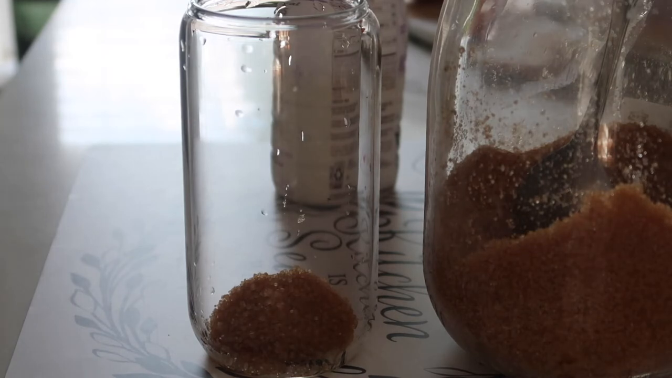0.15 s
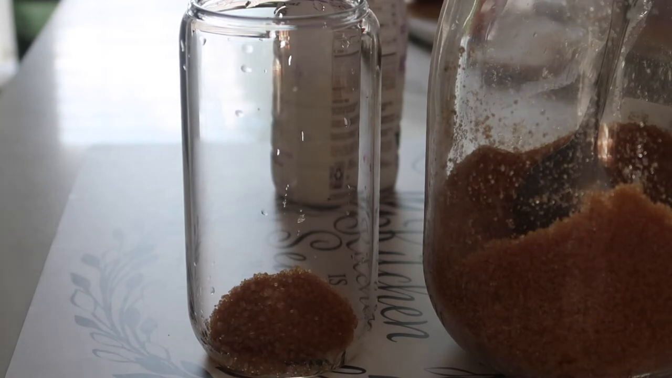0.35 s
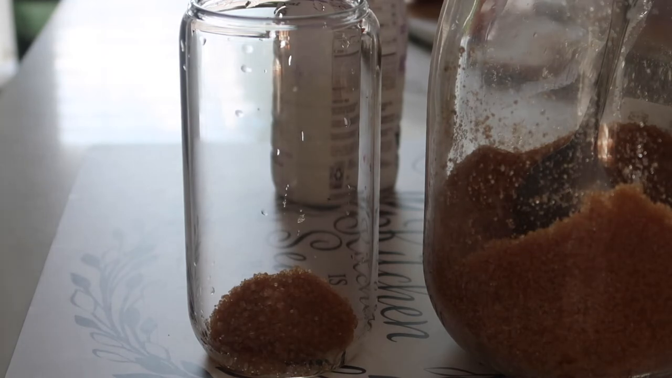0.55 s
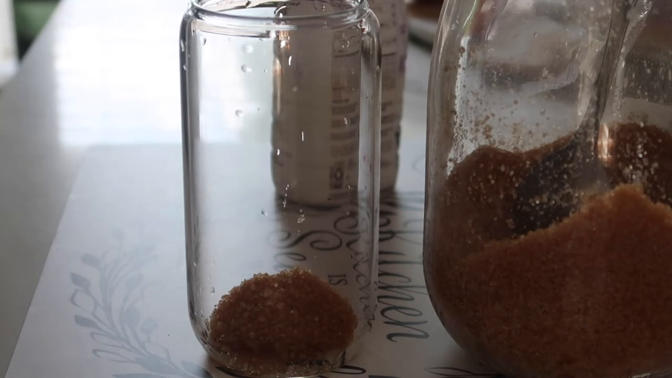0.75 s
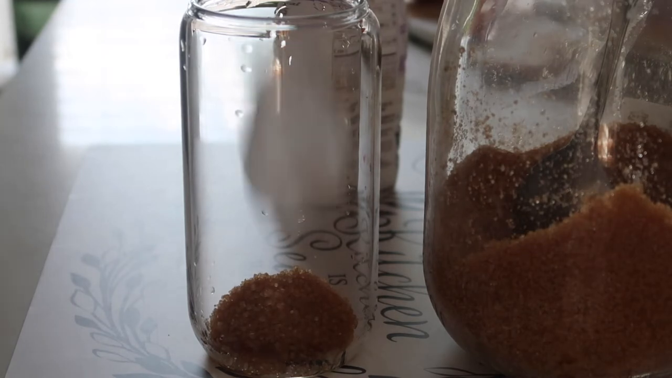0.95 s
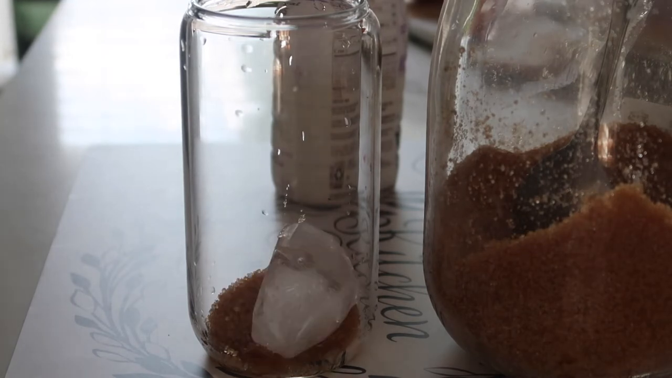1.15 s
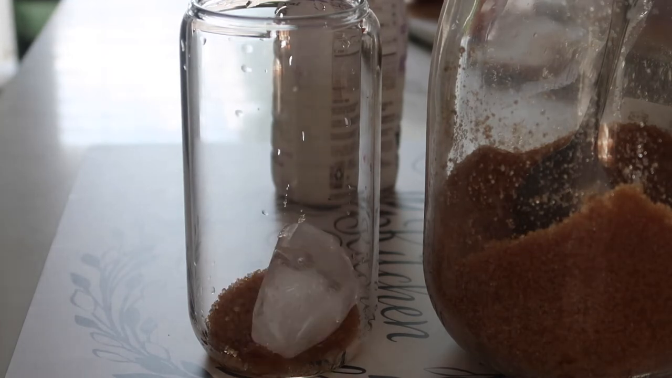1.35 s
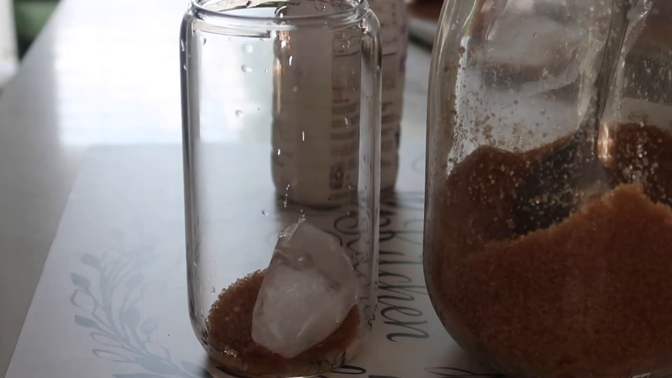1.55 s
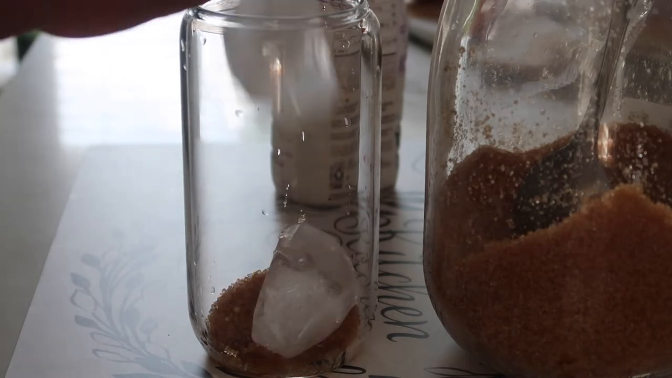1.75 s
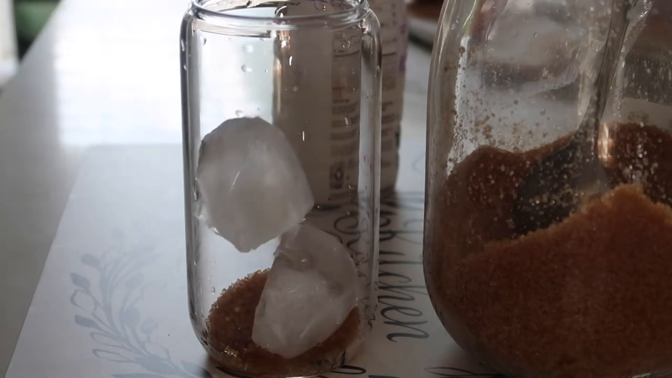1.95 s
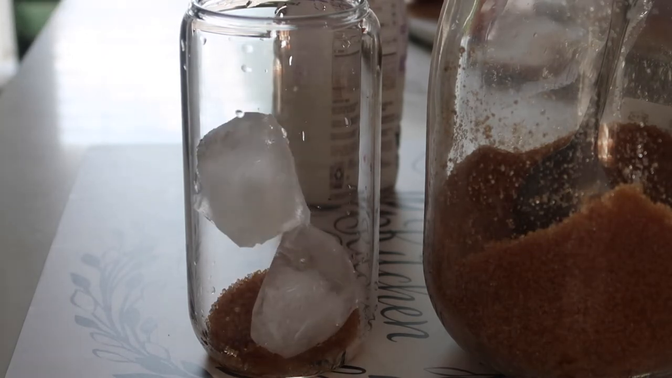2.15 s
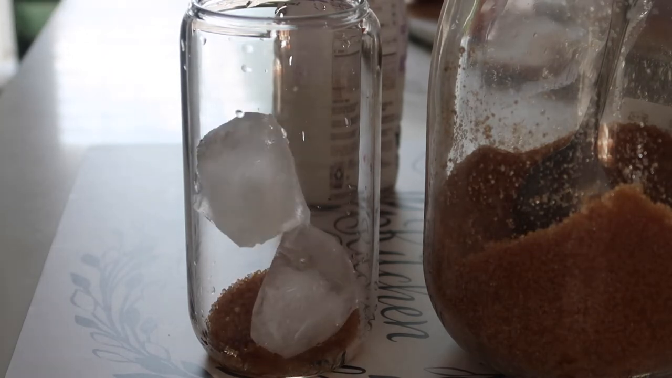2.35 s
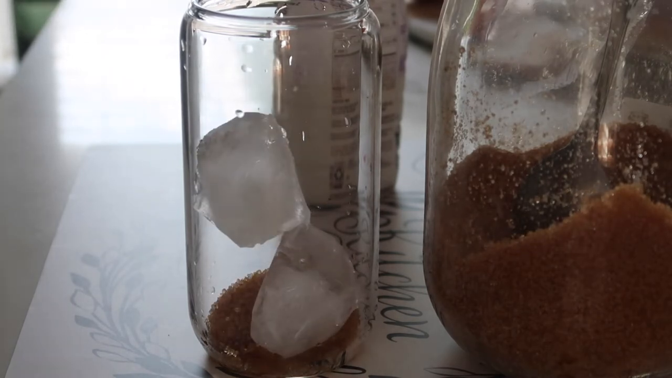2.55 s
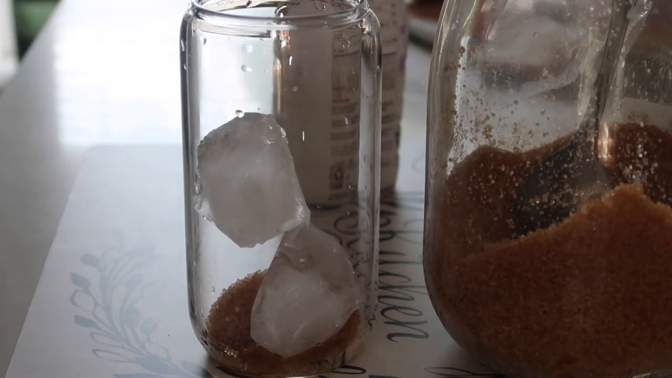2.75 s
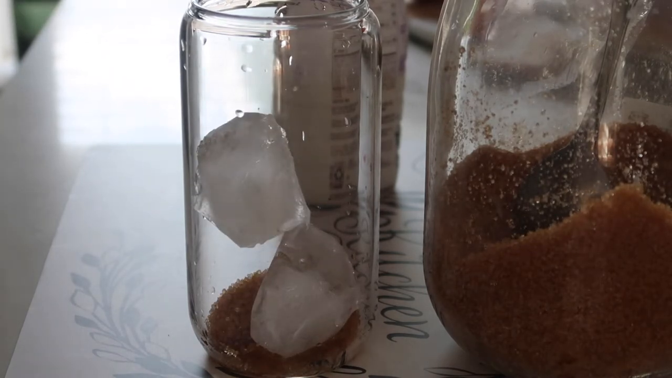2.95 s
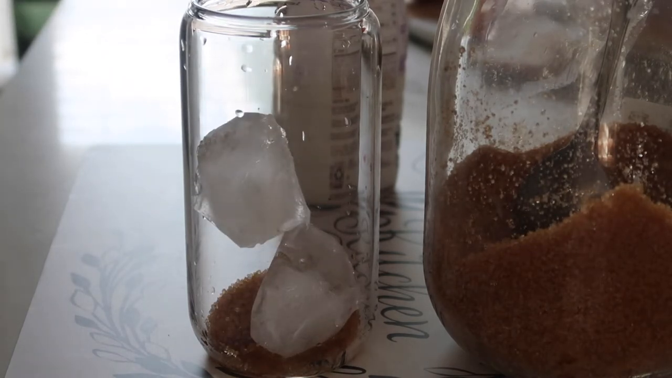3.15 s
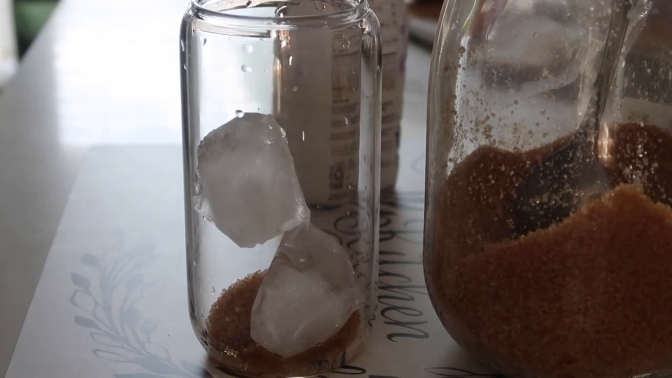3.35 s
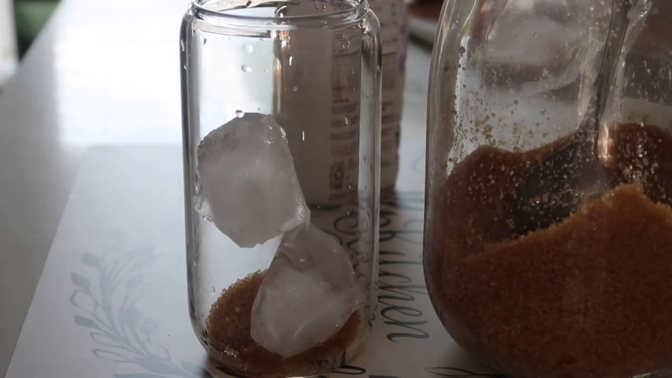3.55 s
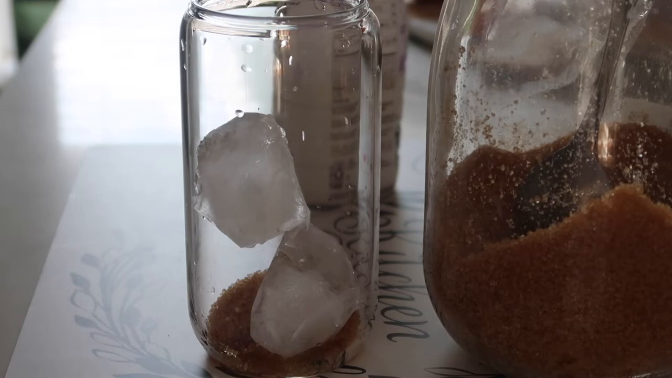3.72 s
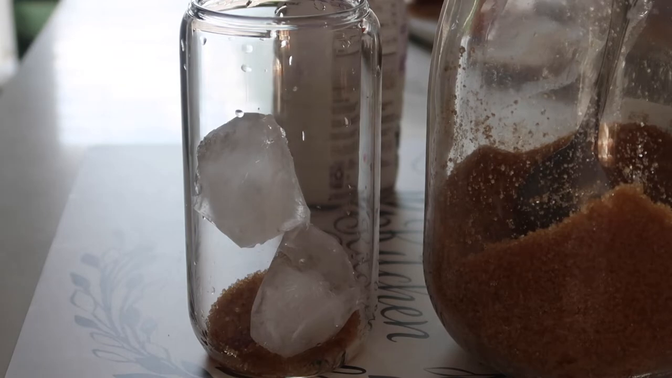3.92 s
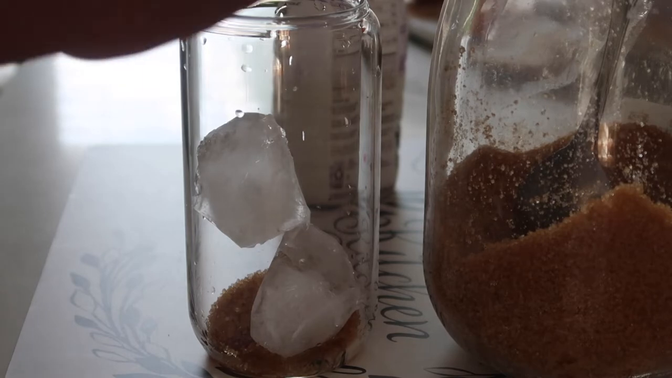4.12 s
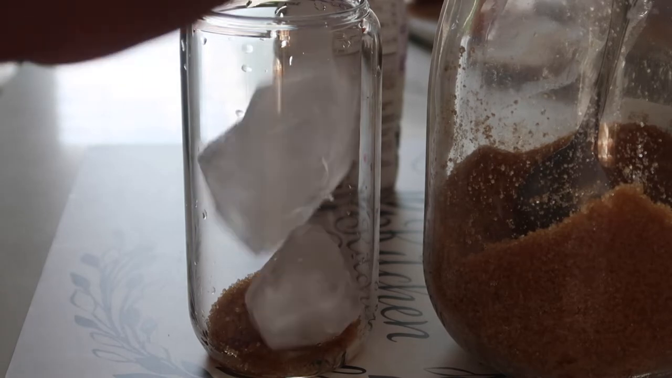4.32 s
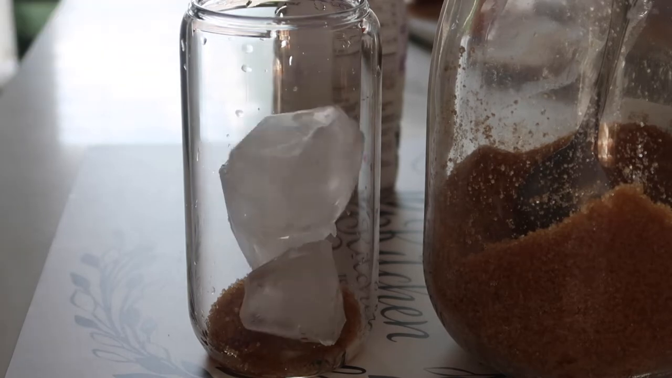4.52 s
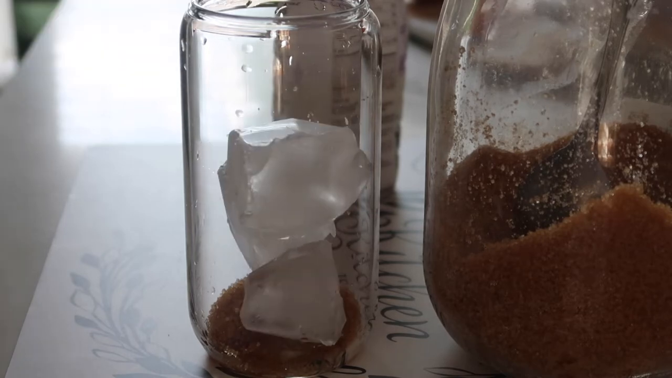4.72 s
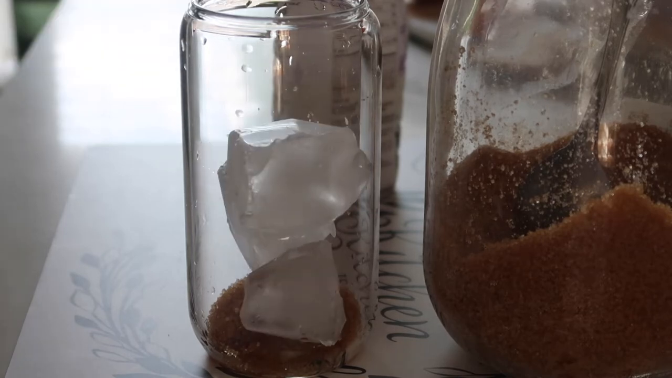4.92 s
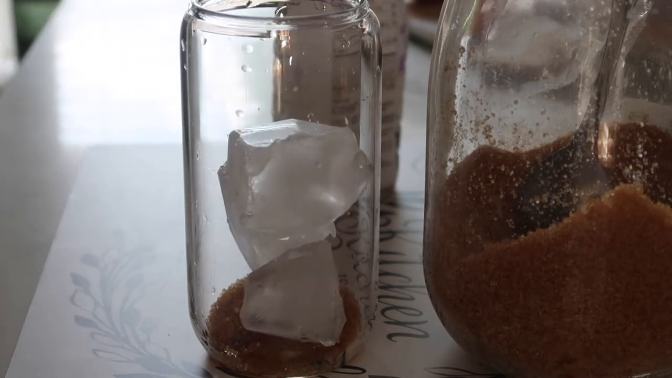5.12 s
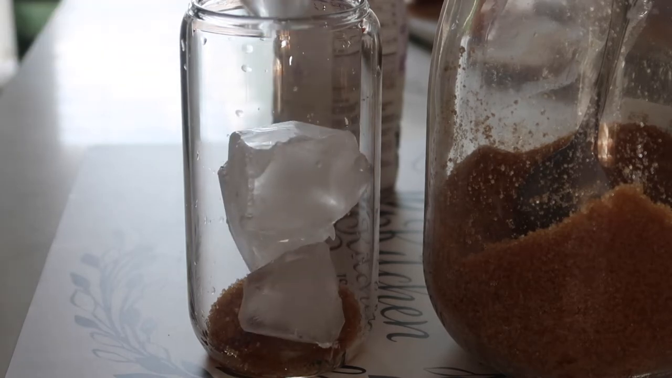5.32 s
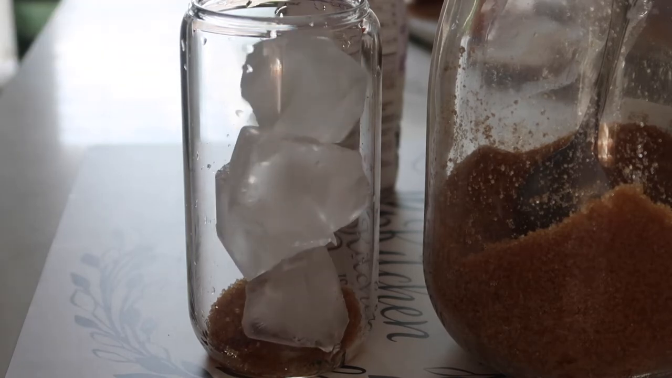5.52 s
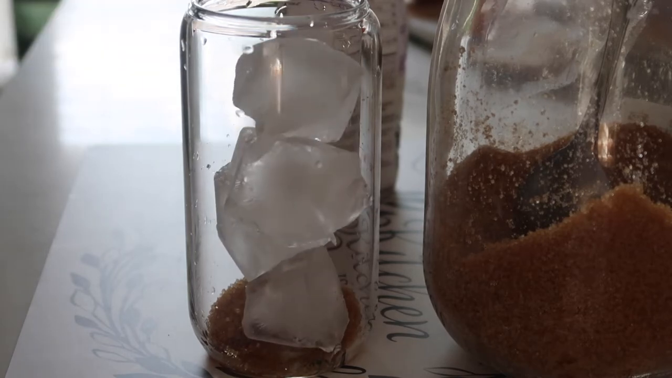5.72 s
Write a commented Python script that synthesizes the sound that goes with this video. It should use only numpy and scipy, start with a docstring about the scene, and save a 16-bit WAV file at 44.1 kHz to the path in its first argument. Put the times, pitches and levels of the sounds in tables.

```python
"""After a soft bump, ice clatters in a tray a little way off, over the hum and air rush of an appliance.
Then four ice cubes drop one by one into a glass jar on a table, near a camera in a small, live room.
The first two let the jar ring freely; from the third on, wedged ice dulls it. Tray clatter falls between drops.
Blows are shaped pulses, glass and table sums of decaying modes, the appliance sines and coloured noise.
Loud blows make the camera's gain control duck the whole sound, hum included."""
import sys
import numpy as np
from scipy import signal
from scipy.fft import rfft, irfft
from scipy.io import wavfile
from scipy.ndimage import minimum_filter1d

SR = 44100
rng = np.random.default_rng(int(sys.argv[2]) if len(sys.argv) > 2 else 0)


def put_to_file(sound):
    """Save the sound as 16-bit audio at rate SR, in the file named by the first command-line argument."""
    columns = np.atleast_2d(sound).T  # one column per channel
    safe = np.clip(columns, -1, 1)
    whole_steps = np.round(safe * 32767)
    wavfile.write(sys.argv[1], SR, whole_steps.astype(np.int16))


N = 259308

# appliance motor lines, before the swell: (frequency [Hz], level [dB])
HUM_LINES = [(58.1, -48), (92.2, -48.5), (116.3, -48.5), (174.4, -47), (232, -51), (354.5, -52.5),
             (414, -56), (462, -51)]
# air rush spectrum: (frequency [Hz], relative density [dB])
AIR_SPECTRUM = [(20, -32), (40, -1.5), (75, -15), (130, -2.5), (200, -2.5), (350, -4), (500, -4.5),
                (800, -3.5), (2000, -6.5), (3500, -15), (6000, -26.5), (9400, -39), (11500, -62),
                (15000, -73)]
# background level: starts low, rises, then holds nearly steady: (time [s], gain [dB])
BACKGROUND_LEVEL = [(0, -6), (.45, -5), (.8, 0), (1.5, 1), (2.4, 1), (3.8, 0.5), (4.8, 0.5), (5.88, -1)]
# soft, dull bumps: (time [s], level before envelope [dB])
BUMPS = [(.029, -27.5)]
# bump spectrum: (frequency [Hz], relative level [dB])
BUMP_SPECTRUM = [(100, -60), (230, -2), (400, -5), (800, -11), (1500, -15.5), (5000, -25.5), (9000, -32),
                 (15000, -45)]
# room decay: (frequency [Hz], t60 [s])
ROOM_DECAY = [(150, 0.44), (600, 0.62), (2000, 0.48), (5000, 0.49), (9000, 0.53), (15000, 0.22)]
# stereo width: (frequency [Hz], side against mid [dB])
STEREO_WIDTH = [(60, -61), (250, -19.5), (1000, -18.5), (2400, -14), (4500, -4), (7500, 4), (12000, 14)]
# tray knocks: (time [s], clack [dB], cube pitch [Hz], cube note [dB], note t60 [s], thud [dB], tick [dB])
TRAY_KNOCKS = [(0.2228, -23, 3450, -44, .03, -8, 24), (.395, -17, 2420, -31, .15, 3, 10),
               (.522, -19.5, 4740, -44, 0.028, -14, 16.5), (2.652, -15, 2100, -42, .03, 1, 9),
               (2.838, -3.5, 1950, -24, .05, -5.5, 6), (2.8459, -11, 1740, -1.5, .026, 3, -11),
               (2.862, -14, 1720, -20, 0.036, 3, -5), (2.885, -6, 1760, -19, .05, 4, -1),
               (2.8934, -6.5, 1690, -2, 0.025, 2.5, -10), (2.9153, 2.5, 2000, -15, .04, 1, 3.5),
               (2.924, -4, 1635, -13, .035, 7, 5), (2.942, -12, 1850, -14, .04, 8, -2),
               (2.9653, -16, 1655, -13, 0.028, -3, -2), (3.0607, -15, 1720, -18, .03, -9, -5),
               (3.0944, -3, 4300, -26, .06, -17.5, 3.5), (3.114, -13.5, 2030, -24, .06, -8, 8),
               (3.1413, -15, 3360, -31, .1, -12.5, 4), (3.3428, -8, 2200, -31, .03, -5, 16),
               (3.4081, -8.5, 1940, -30, .05, -8, 3), (3.6495, -16, 1980, -34, .05, 0, -11),
               (4.9440, -8.5, 2250, -25, .018, -0.5, -10), (4.9997, 1.5, 2070, -1, 0.015, -19, 1),
               (5.0009, -2, 2027, -18, 0.59, -18, -5), (5.0103, -9, 1737, -15, 0.29, -20, -7),
               (5.0228, -1.5, 2113, -17.5, 0.32, -25, -16), (5.0253, -2, 2350, -1, .014, -22, -3),
               (5.0355, -5, 2457, -23, 0.18, -20, 2), (5.0455, -6.5, 3420, -29, 0.22, -11, 12),
               (5.063, -8, 2821, -30, .1, -14, 3), (5.411, -8, 3010, -22, 0.04, 24, 31)]
# loose cubes nudge and crunch in the tray:
# (start [s], end [s], contacts [1/s], level [dB], pitch [Hz], thud [dB], tick [dB])
TRAY_STIRS = [(.3, .46, 18, -19.5, 2600, -12, 5), (2.84, 2.98, 90, -20, 1990, 1, -3),
              (2.885, 2.965, 170, -19.5, 800, 3, -2), (2.98, 3.52, 18, -23, 3260, -7, 3),
              (4.77, 4.83, 18, -20, 2600, -18, -1)]
# ice sliding over the tray: (loudest at [s], half length [s], level [dB], tick [dB])
TRAY_SLIDES = [(0.221, .016, -41.5, 4.5), (0.357, 0.034, -38.5, -2), (0.525, 0.0094, -43.5, 1.5),
               (3.368, 0.016, -53, 9)]
# sliding spectrum: (frequency [Hz], relative level [dB])
SLIDE_SPECTRUM = [(300, -19), (1500, -10), (2600, 2), (5500, -1), (9000, -11.5), (15000, -20)]
# ice-on-tray contact spectrum: (frequency [Hz], relative level [dB])
TRAY_CONTACT = [(60, -35), (200, -14), (420, 1), (650, 0), (1100, 1.5), (2300, 2), (3800, 0), (5200, -5),
                (6500, -13), (10000, -27.5), (16000, -50)]
# ice-on-jar contact spectrum: (frequency [Hz], relative level [dB])
JAR_CONTACT = [(60, -42), (200, -18.5), (380, -6), (560, 6.5), (1100, 1), (2300, 3), (3800, -3.5),
               (5200, -4.5), (6500, -15.5), (10000, -27.5), (16000, -57)]
# ice striking the jar: (time [s], clack [dB], cube pitch [Hz], cube note [dB], note t60 [s],
# ring [dB], overtones [dB], height on the wall [clipped to -1..1])
JAR_BLOWS = [(1.0098, -11.5, 840, -31, 0.13, -17.5, 7, -1.6),
             (1.1025, -2, 4130, -22, 0.2, -18.5, 11, -0.97), (1.1031, -14, 4610, -11, 0.041, -31, 15, -1),
             (1.1069, -7, 2520, -24, 0.055, -2, -19, -1), (1.9079, 0, 2806, -7.5, 0.06, -19, 6, -0.83),
             (1.9092, -7.5, 1644, -16, 0.037, -26, -4, 0), (1.9508, -10, 2220, -15, .03, -1.5, -10, 0),
             (1.9587, 2.5, 2210, 0.5, 0.032, 4, 0.5, .5), (1.996, -40, 2300, -35, .02, -17, 18.5, 0.68),
             (2.1695, -15, 920, -34, 0.024, -21.5, -2, 0.68), (4.3420, 4, 2310, -2, 0.028, -5, -4, 0.37),
             (4.3436, -5, 1490, -9, 0.13, -22, -3, -0.093), (4.3520, -5, 1610, -4, 0.067, -24, 3, .1),
             (4.3740, -13, 2270, -25, .02, -10.5, 3, 0.36), (4.3925, -5, 2700, -22, .03, -22, 5, 0),
             (4.4251, 1.5, 2400, -11, 0.023, -12, 6.5, 0.63), (4.4335, -4.5, 735, -13, 0.056, -17, 6, 0),
             (4.4398, -5.5, 1400, -8, 0.025, -10.5, 10, -0.35),
             (4.4478, 2.5, 2320, -11, .04, -14.5, 5, -0.38), (4.4570, -6.5, 2000, -11, .04, -13, -4, -.5),
             (4.4648, -1.5, 2310, -18, .03, -9, 2, 0), (4.4765, -10, 2550, -19, .03, -23, 0, -.5),
             (4.4840, -9, 2160, -8, 0.023, -24, 1, -.5), (4.5225, -14.5, 2150, -32, .02, -27, 4, 0.6),
             (4.5320, -13, 715, -30, .05, -28, 9.5, 0.39), (4.5650, -11, 2020, -32, .02, -25.5, -2, 0.5),
             (5.4685, -1.5, 576, -13, 0.072, -19.5, 16.5, -.9), (5.4765, -9, 857, -15, .05, -30, 8, -.5),
             (5.4818, 6.5, 2657, 2, 0.021, -23, 11, 0.5), (5.4826, -6, 4770, 2, 0.045, -23, 8, -1),
             (5.4900, -7, 2460, -13, .04, -23, 10, 0), (5.4985, -3.5, 1860, -19, .03, -21, 13, 0.58),
             (5.5345, 1, 2290, 2, 0.066, -13, 6, -0.8), (5.5933, 0.5, 2460, -26, .02, -23, 17, -1.1),
             (5.6133, -1.5, 1700, -1, 0.019, -35, 0, 0), (5.6230, -5, 560, -22, .14, -30, 9, 0),
             (5.6758, -15.5, 1900, -26, .02, -41, -4, 0)]
# free modes of the jar's wall: (frequency [Hz], level [dB], t60 [s], gain when struck high [dB])
JAR_MODES = [(2186, 0, .56, 0), (4610, -25, .2, 5), (4667, -25, .2, 9), (4716, -20, .38, 9),
             (4745, -24, .3, 9), (4975, -22, .14, -3), (5043, -14, .13, -4), (5160, -20, .06, -6),
             (7400, -39, .3, -2), (8100, -38, .24, 6), (8260, -37, .2, 3), (9730, -45, .26, -1),
             (10190, -41, .28, 2), (10720, -42, .18, 5), (12790, -46, .25, 3), (13440, -45, .2, 2),
             (14310, -49, .2, 2)]
# modes of the table under the jar: (frequency [Hz], level [dB], t60 [s])
TABLE_MODES = [(130, -31, 0.19), (170, -25, 0.073), (299, -23.5, 0.047), (360, -23, 0.028),
               (531, -18.5, 0.072), (599, -13, 0.081), (810, -34, 0.023)]
# a cube comes to rest against the wall and chokes the ring: (time [s], loss [dB])
RING_CATCHES = [(1.238, 2.5), (1.305, 3), (2.008, 6.5), (2.112, 8), (4.398, 3), (4.487, 9), (5.594, 4)]
# a wedged cube judders down the jar's wall:
# (start [s], end [s], contacts [1/s], level [dB], pitch [Hz], thud [dB], tick [dB])
WALL_RATTLES = [(4.432, 4.49, 200, -14, 2400, -10, -8), (5.62, 5.68, 60, -22, 2600, -3, 0)]
# share of the free ring that reaches the room: (frequency [Hz], gain [dB])
FREE_RING_THROW = [(2300, -12.5), (4500, -8), (7500, -4.5)]

AIR_DB = -35.5  # before the swell
LAST_CUBE_S = 4.9  # from here on, the last cube snaps free of the tray with drier cracks
RESTING_S = 1.1  # from here until WEDGED_S, ice leans on the wall and splits its modes
WEDGED_S = 4.0  # from the third cube on, ice is wedged against the wall
NEW_CUBE_S = 0.5  # a blow after this much quiet is the next cube landing
BEAT_HZ = 13.3  # between the two halves of a split mode
# thud of the first cube; extra on landing; loss for each cube already in the jar
THUD_DB, LANDING_DB, CUSHION_DB = 6.5, 5, 5
TICK_DB, TICK_PER_DB, THUD_PER_DB = -8, 0.4, 0.02  # blow level sets tick and, slightly, thud
ROCK_S, ROCK_GAP_S, ROCK_DB = 1.997, 0.046, -13.5  # the second cube leaves the jar rocking on its base
EDGE_HZ = 15750  # band limit


def amp(db):
    """Decibels to amplitude ratio."""
    return 10 ** (np.asarray(db) / 20)


def evened(x):
    """Scales x to unit RMS."""
    return x / np.sqrt(np.mean(x ** 2) + 1e-20)


def read(points, hz):
    """Reads a table on a log-frequency axis."""
    f, value = np.transpose(points)
    return np.interp(np.log(hz + 1), np.log(f + 1), value)


def add(mix, s, sound):
    """Adds sound into mix at s seconds, cut at the end."""
    part = mix[..., round(s * SR):][..., :sound.shape[-1]]
    part += sound[..., :part.shape[-1]]


def coloured(x, points):
    """Filters x by a spectrum table."""
    gain = amp(read(points, np.fft.rfftfreq(len(x), 1 / SR)))
    return irfft(rfft(x) * gain, len(x))


def room(x, build_s=0.00079, early_db=3, early_s=0.014):
    """Dense reflections as mid and side, strongest early; each band dies at its own speed."""
    hz, frame_s, z = signal.stft(rng.standard_normal((2, SR)), SR, nperseg=256)
    z = z * np.exp(-np.log(1000) * frame_s / read(ROOM_DECAY, hz)[:, None])
    tail = signal.istft(z, SR)[1][:, :SR]
    t = np.arange(SR) / SR
    tail = tail * (1 - np.exp(-(t / build_s) ** 2)) * amp(early_db * np.exp(-t / early_s))
    tail = np.array([tail[0], coloured(tail[1], STEREO_WIDTH)]) / np.linalg.norm(tail[0])
    return signal.fftconvolve(x[None], tail, axes=1)[:, :N]


def near(x, side_db=-6):
    """Direct sound as mid and side: mainly its treble differs between the microphones."""
    return np.array([x, amp(side_db) * coloured(signal.hilbert(x).imag, STEREO_WIDTH)])


def appliance(waver_hz=1.43):
    """Wavering motor lines in a rush of air, under one slow swell."""
    t = np.arange(N) / SR
    mid, side = (evened(coloured(noise, AIR_SPECTRUM)) for noise in rng.standard_normal((2, N)))
    out = amp(AIR_DB) * np.array([mid, coloured(side, STEREO_WIDTH)])
    for hz, db in HUM_LINES:
        drift = np.interp(t, np.linspace(0, t[-1], 60), rng.standard_normal(60))
        cycles = np.cumsum(hz + waver_hz * drift) / SR + rng.random()
        out[0] += amp(db) * np.sqrt(2) * np.sin(2 * np.pi * cycles)
    return out * amp(np.interp(t, *np.transpose(BACKGROUND_LEVEL)))


def bump(rise_s=0.005, decay_s=0.079):
    """A low, toneless bump: coloured noise with a soft rise and exponential decay."""
    out, t = np.zeros(N), np.arange(SR // 2) / SR
    for s, db in BUMPS:
        noise = evened(coloured(rng.standard_normal(len(t)), BUMP_SPECTRUM))
        add(out, s, amp(db) * noise * (1 - np.exp(-t / rise_s)) * np.exp(-t / decay_s))
    return near(out)


def clack(hz, thud_db, tick_db, surface=JAR_CONTACT, peak_db=12, width=0.11,
          chatter_db=-1, chatter_s=0.0026, blunt_hz=6000, size=2048):
    """One contact: a blunt pulse with a broad resonance, then the rough faces chatter for a moment."""
    f, t = np.fft.rfftfreq(size, 1 / SR), np.arange(size) / SR
    db = read(surface, f) + peak_db / (1 + ((f / hz - 1) / width) ** 2)
    db = db + thud_db / (1 + (f / 1200) ** 4)
    db = db + tick_db * (1 - 1 / (1 + (f / 4500) ** 4))
    # minimum phase: energy comes as early as the spectrum allows
    log_gain = np.log(amp(np.r_[db, db[-2:0:-1]]))
    causal = np.exp(np.conj(signal.hilbert(log_gain)))[:len(f)]
    chatter = rng.standard_normal(size) * np.exp(-t / chatter_s) * (1 - np.exp(-t / chatter_s))
    chatter = amp(chatter_db) * chatter / np.linalg.norm(chatter)
    touch = 1 / (1 + 1j * f / blunt_hz) ** 2 + rfft(chatter)
    return irfft(causal * touch, size) / abs(irfft(causal, size)).max()


def note(hz, t60, rise_s, split=0.022, twin_db=-6):
    """A cube's own short note: two close modes, as its sides are not quite equal."""
    t = np.arange(SR // 2) / SR
    pair = np.sin(2 * np.pi * hz * t) + amp(twin_db) * np.sin(2 * np.pi * hz * (1 + split) * t)
    return pair / (1 + amp(twin_db)) * (1 - np.exp(-t / rise_s)) * np.exp(-np.log(1000) * t / t60)


def rebounds(gap_s, loss_db, uneven=0.35, scatter_db=2, pitch_spread=0.045):
    """A contact and its rebound, typically weaker and on another corner: (delay s, dB, pitch ratio)."""
    late, strong, corner = rng.standard_normal(3)
    rebound = gap_s * np.exp(uneven * late), scatter_db * strong - loss_db, np.exp(pitch_spread * corner)
    return [(0, 0, 1), rebound]


def scattered(spans, scatter_db=3, pitch_spread=0.291):
    """Small contacts at uneven intervals in each span: (s, dB, pitch Hz, thud dB, tick dB)."""
    for start_s, end_s, per_s, db, hz, *colour in spans:
        span_s = end_s - start_s
        count = max(round(per_s * span_s), 1)
        for k, (late, strong, small) in enumerate(rng.uniform(-1, 1, (count, 3))):
            s = start_s + span_s * (k + (1 + late) / 2) / count
            yield s, db + 2 * scatter_db * strong, hz * np.exp(2 * pitch_spread * small), *colour


def sliding(grains_per_s=2500, spread_db=4):
    """Ice slides over the tray: a swell of fine grains."""
    out, t = np.zeros(N), np.arange(-SR // 8, SR // 8) / SR
    for s, half_s, db, tick_db in TRAY_SLIDES:
        hits = rng.random(len(t)) < grains_per_s / SR
        strength = amp(spread_db * rng.standard_normal(len(t)))
        grains = hits * strength * rng.choice([-1, 1], len(t))
        rasp = coloured(evened(coloured(grains, SLIDE_SPECTRUM)), [(3500, 0), (9000, tick_db)])
        add(out, s + t[0], amp(db) * rasp * np.exp(-(t / half_s) ** 2 / 2))
    return out


def jostling_cubes():
    """Every contact in the tray: the knocks with their rebounds, and small nudges at random."""
    for s, db, hz, _, _, *colour in TRAY_KNOCKS:
        for delay_s, weaker_db, ratio in rebounds(gap_s=0.012, loss_db=11.5):
            yield s + delay_s, db + weaker_db, hz * ratio, *colour
    yield from scattered(TRAY_STIRS)


def tray(room_db=1, last_room_db=-4, resonance_db=13, small_cube_db=11, rise_share=0.044, longest_rise_s=0.003):
    """Cubes jostle further off, heard largely through the room; big, low cubes resonate most."""
    knocks = sliding()
    for s, db, hz, thud_db, tick_db in jostling_cubes():
        peak_db = resonance_db - small_cube_db * max(np.log2(hz / 1700), 0)
        hit = clack(hz, thud_db, tick_db, TRAY_CONTACT, peak_db, width=0.16, chatter_db=-1.5, chatter_s=0.00088)
        add(knocks, s, amp(db) * hit)
    for s, _, hz, note_db, t60, *_ in TRAY_KNOCKS:
        add(knocks, s, amp(note_db) * note(hz, t60, rise_s=min(rise_share * t60, longest_rise_s)))
    send_db = np.where(np.arange(N) / SR < LAST_CUBE_S, room_db, last_room_db)
    return near(knocks) + room(knocks * amp(send_db))


def thud(low_hz=130):
    """The jar's base pushes on the table, which radiates little deep bass."""
    t = np.arange(SR // 2) / SR
    modes = sum(amp(db) * np.exp(-np.log(1000) * t / t60) * np.sin(2 * np.pi * hz * t)
                for hz, db, t60 in TABLE_MODES)
    return signal.sosfilt(signal.butter(2, low_hz, "high", fs=SR, output="sos"), modes)


def rocking(count=5):
    """The jar's base taps the table a few times, evenly."""
    out = np.zeros(N)
    for k in range(count):
        add(out, ROCK_S + k * ROCK_GAP_S, amp(ROCK_DB) * thud())
    return out


def ring(overtones_db, height, leaning, wedged, twin_db=-9, twin_s=0.74, stiffening_hz=470, damping=1.9,
         scatter=0.0089, buzz=0.57, buzz_hz=160, rise_s=0.00043):
    """Wall modes as mid and side: leaning ice splits each into a beating pair, wedged ice stiffens and damps."""
    t = np.arange(2 * SR // 3) / SR
    free_hz, db, t60, height_db = np.transpose(JAR_MODES)[:, :, None]
    overtone = free_hz > free_hz[0]
    # the ice leans differently at every blow, so the wedged pitches scatter
    hz = np.sqrt(free_hz ** 2 + wedged * stiffening_hz ** 2)
    hz = hz * (1 + scatter * wedged * rng.standard_normal(db.shape))
    level = amp(db + np.clip(height, -1, 1) * height_db + overtones_db * overtone)
    fade = np.log(1000) * (1 + damping * wedged) / t60
    # the twin that rubs on the ice dies first: the beat grows ever gentler
    beat = 1 - amp(twin_db) * leaning * np.exp(-2j * np.pi * BEAT_HZ * t - t / twin_s)
    # ice buzzing on the wall roughens the overtones, and the main tone too once wedged
    jolts = rng.standard_normal((len(JAR_MODES), 200)) + 1j * rng.standard_normal((len(JAR_MODES), 200))
    flutter = np.array([np.interp(t * buzz_hz, np.arange(len(row)), row) for row in jolts])
    rough = 1 + buzz * np.maximum(overtone, wedged) * flutter
    tone = (1 - np.exp(-t / rise_s)) * np.exp((2j * np.pi * hz - fade) * t)
    modes = level * beat * rough * tone
    facing = amp(read(STEREO_WIDTH, hz)) * rng.choice([-1, 1], hz.shape)
    return np.array([modes.imag.sum(0), (facing * modes.real).sum(0)])


def choke(s, size, grip_s=0.0016):
    """Gain over time of a ring struck at s, as later catches damp it."""
    t = s + np.arange(size) / SR
    return amp(-sum(loss_db * (at_s > s) * (1 + np.tanh((t - at_s) / grip_s)) / 2
                    for at_s, loss_db in RING_CATCHES))


def falling_cubes():
    """Every blow in the jar with its rebound: thuds grow on landing and shrink as the pile rises."""
    pile, last_s = -1, -np.inf
    for s, db, hz, _, _, ring_db, overtones_db, height in JAR_BLOWS:
        landing = s - last_s > NEW_CUBE_S
        pile, last_s = pile + landing, s
        thud_db = THUD_DB + LANDING_DB * landing - CUSHION_DB * pile + THUD_PER_DB * db
        # wedged cubes rattle on for longer
        gap_s, loss_db = (0.017, 14) if s > WEDGED_S else (0.0083, 23)
        for delay_s, weaker_db, ratio in rebounds(gap_s, loss_db):
            hit_db = db + weaker_db
            tick_db = TICK_DB + TICK_PER_DB * hit_db
            yield s + delay_s, hit_db, hz * ratio, thud_db, tick_db, ring_db + weaker_db, overtones_db, height


def jar(knock_room_db=-4, wedged_room_db=-5, table_db=-7):
    """Each cube clacks, sounds its own note, thumps the table and sets the glass ringing."""
    knocks, rings, free, held = rocking(), np.zeros((2, N)), np.zeros(N), np.zeros(N)
    for s, db, hz, thud_db, tick_db, ring_db, overtones_db, height in falling_cubes():
        leaning, wedged = float(RESTING_S < s < WEDGED_S), float(s > WEDGED_S)
        add(knocks, s, amp(db) * clack(hz, thud_db, tick_db))
        add(knocks, s, amp(db + thud_db + table_db) * thud())
        glass = amp(ring_db) * ring(overtones_db, height, leaning, wedged)
        glass = glass * choke(s, size=glass.shape[1])
        add(rings, s, glass)
        add(held if wedged else free, s, glass[0])
    for s, db, *colour in scattered(WALL_RATTLES):
        add(knocks, s, amp(db) * clack(*colour))
    for s, _, hz, note_db, t60, *_ in JAR_BLOWS:
        add(knocks, s, amp(note_db) * note(hz, t60, rise_s=0.0019))
    send = amp(knock_room_db) * knocks + coloured(free, FREE_RING_THROW) + amp(wedged_room_db) * held
    return near(knocks) + rings + room(send)


def scene():
    """All sources, turned from mid and side to left and right."""
    mid, side = appliance() + bump() + tray() + jar()
    return np.array([mid + side, mid - side])


def gain_control(x, threshold_db=-10, sense_s=0.0014, attack_s=0.0051, creep_db_per_s=9, hold_s=0.638):
    """The gain drops fast on a loud sound, creeps up while it is held, then lets go."""
    def smooth(v, seconds):
        """One-pole average."""
        r = np.exp(-1 / (seconds * SR))
        return signal.lfilter([1 - r], [1, -r], v)
    level_db = 10 * np.log10(smooth((x ** 2).mean(0), sense_s) + 1e-12)
    creep_db, half = creep_db_per_s * np.arange(N) / SR, int(hold_s * SR / 2)
    # highest level of the last hold_s, less the creep since then
    held_db = -minimum_filter1d(-(level_db + creep_db), 2 * half + 1, origin=half, mode="nearest") - creep_db
    return x * amp(-smooth(np.maximum(held_db - threshold_db, 0), attack_s))


def record(dry, low_cut_hz=36):
    """Gain control, the microphone's low cut, clipping of the fastest peaks, then the band limit."""
    low_cut = signal.butter(2, low_cut_hz, "high", fs=SR, output="sos")
    levelled = signal.sosfilt(low_cut, gain_control(dry))
    band = signal.firwin(511, EDGE_HZ, window=("kaiser", 9), fs=SR)
    return signal.oaconvolve(np.clip(levelled, -1, 1), band[None], "same")


dry = scene()
out = record(dry)
put_to_file(out)
```